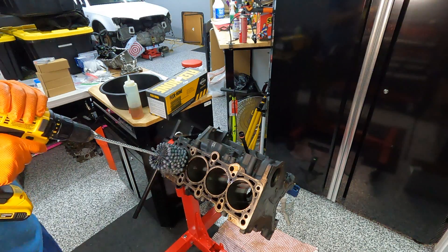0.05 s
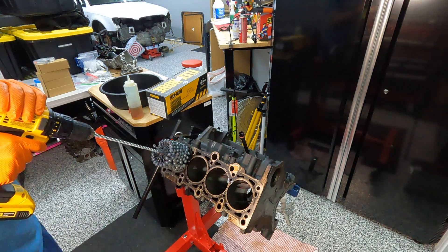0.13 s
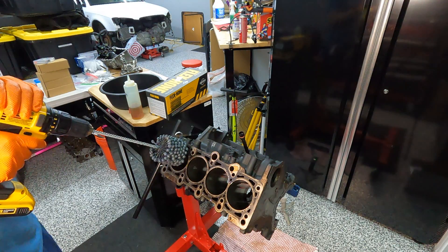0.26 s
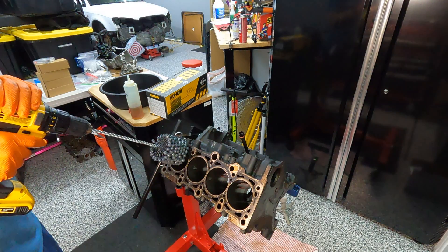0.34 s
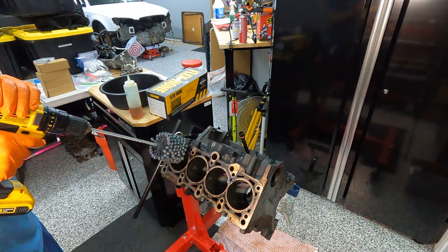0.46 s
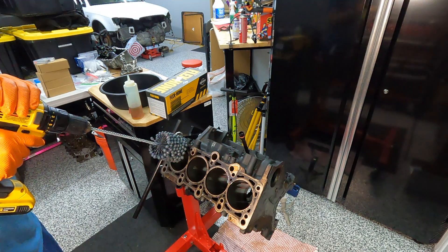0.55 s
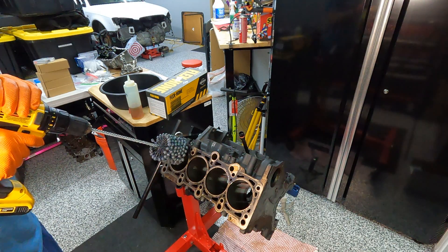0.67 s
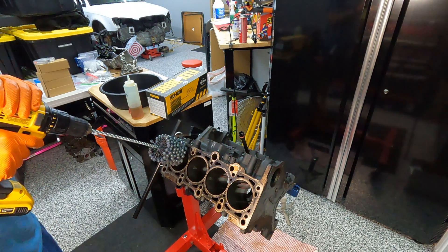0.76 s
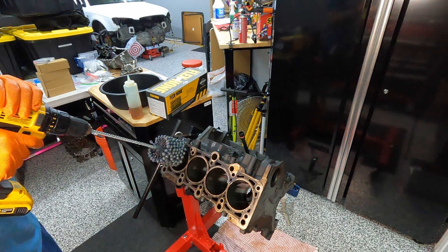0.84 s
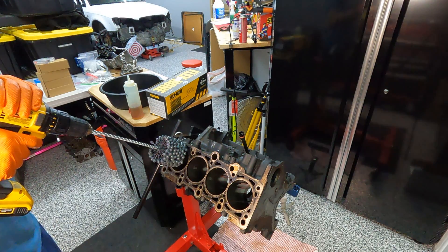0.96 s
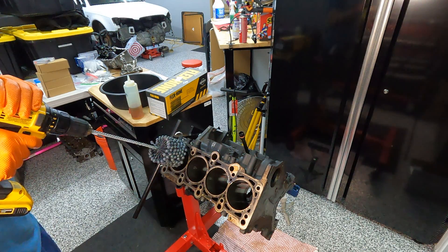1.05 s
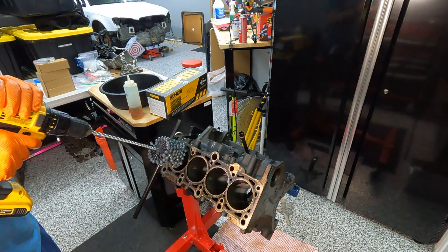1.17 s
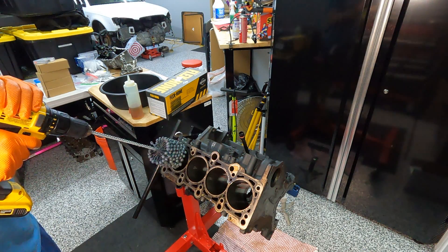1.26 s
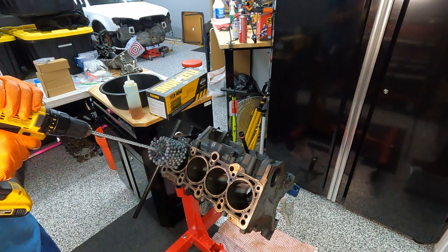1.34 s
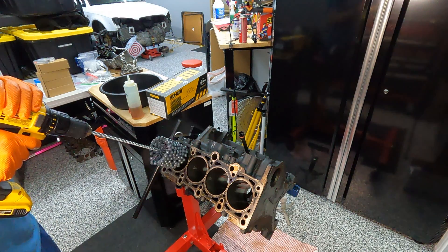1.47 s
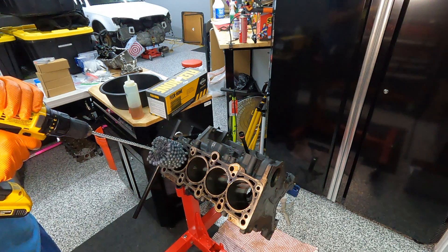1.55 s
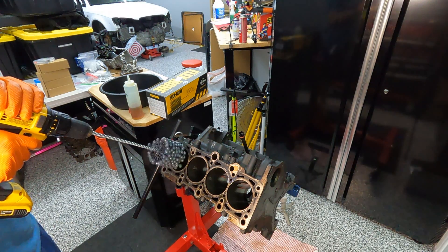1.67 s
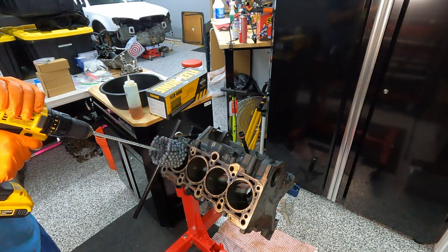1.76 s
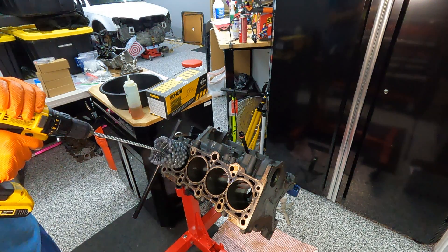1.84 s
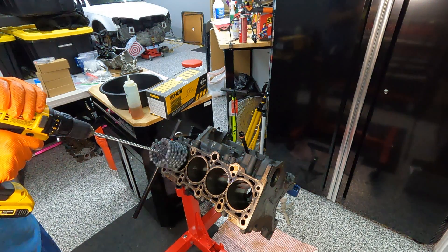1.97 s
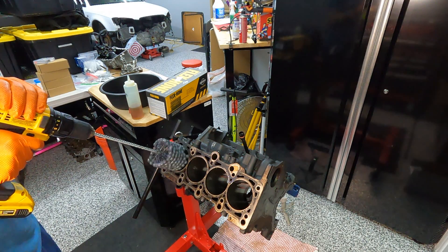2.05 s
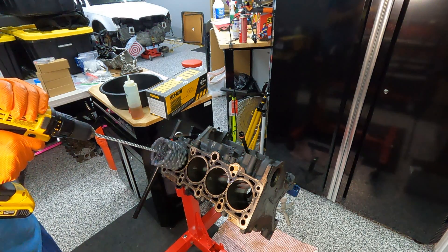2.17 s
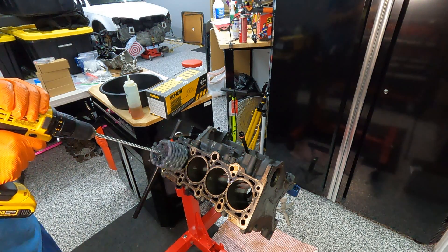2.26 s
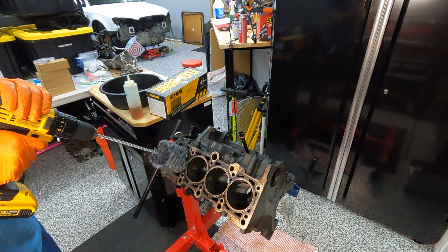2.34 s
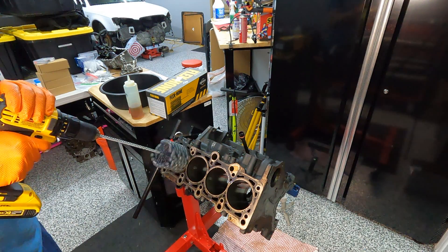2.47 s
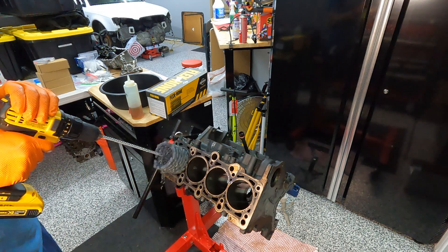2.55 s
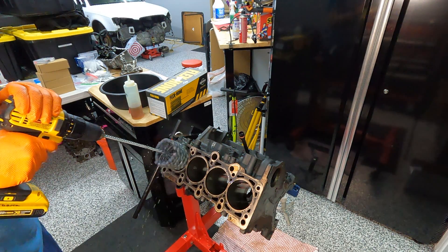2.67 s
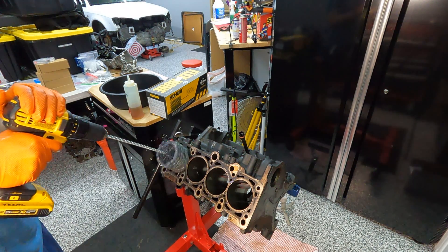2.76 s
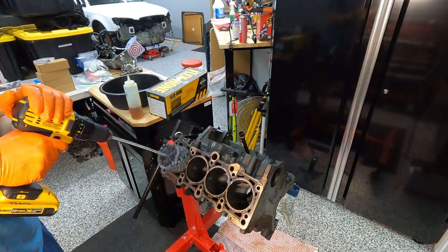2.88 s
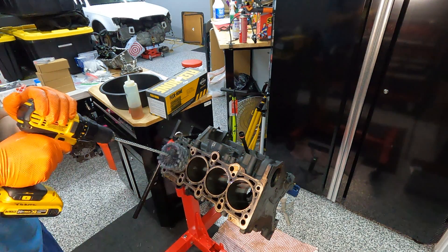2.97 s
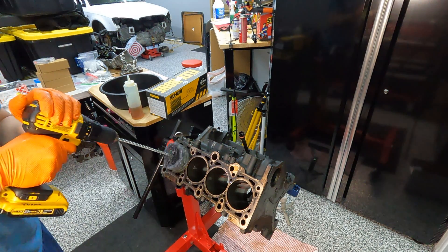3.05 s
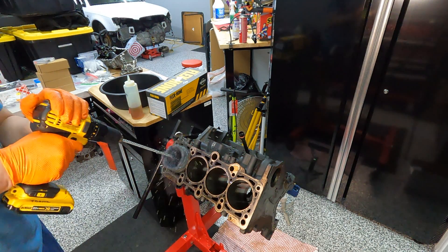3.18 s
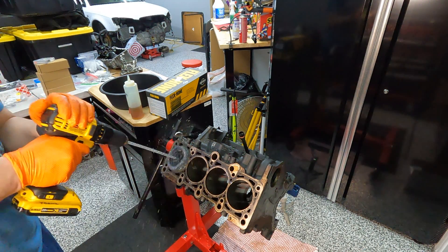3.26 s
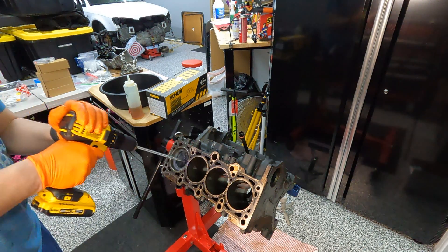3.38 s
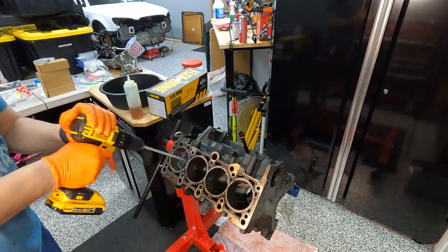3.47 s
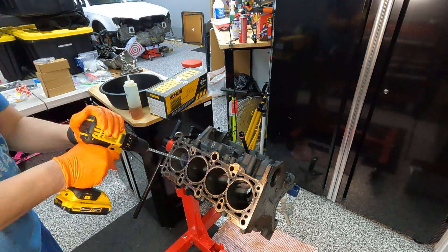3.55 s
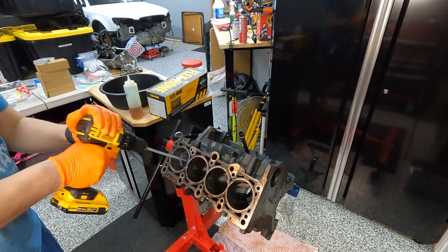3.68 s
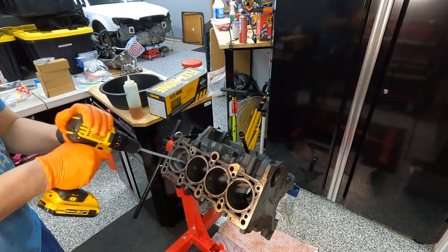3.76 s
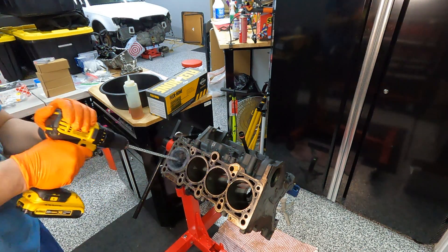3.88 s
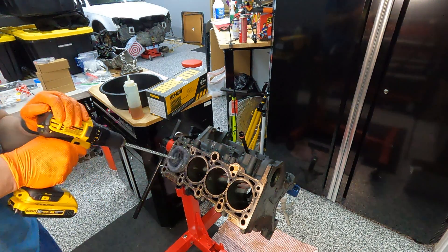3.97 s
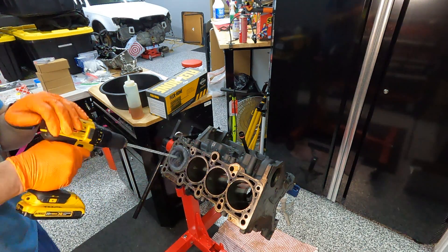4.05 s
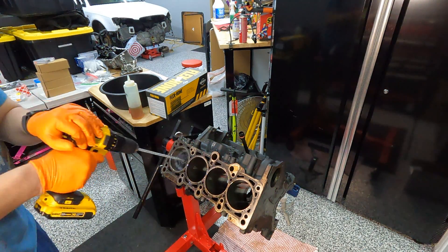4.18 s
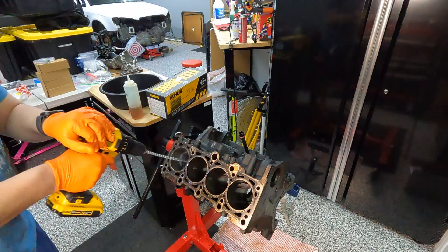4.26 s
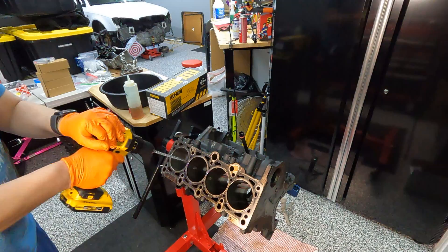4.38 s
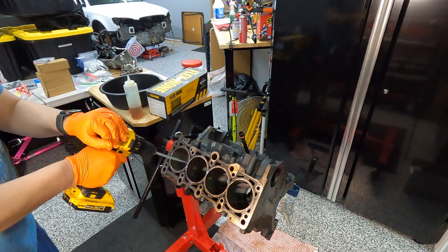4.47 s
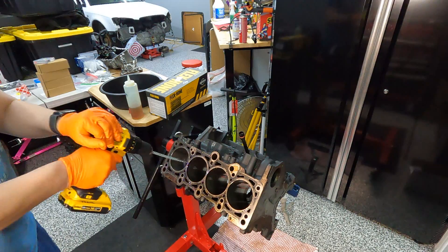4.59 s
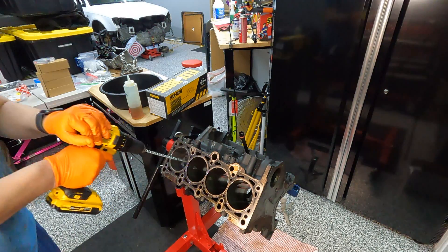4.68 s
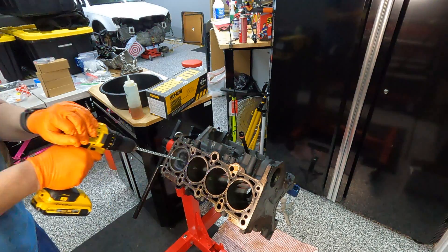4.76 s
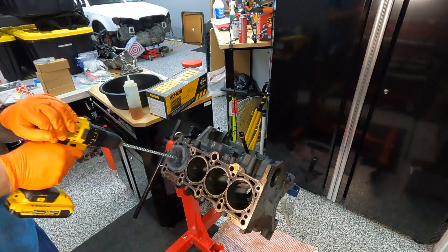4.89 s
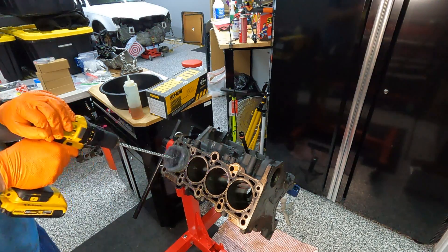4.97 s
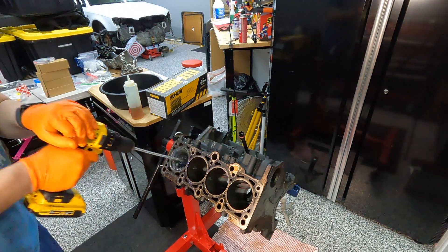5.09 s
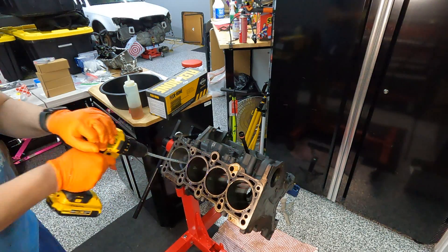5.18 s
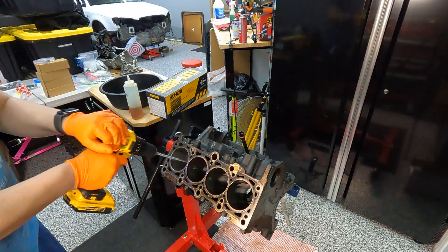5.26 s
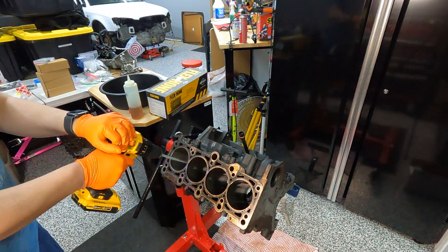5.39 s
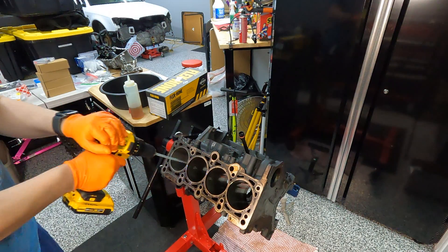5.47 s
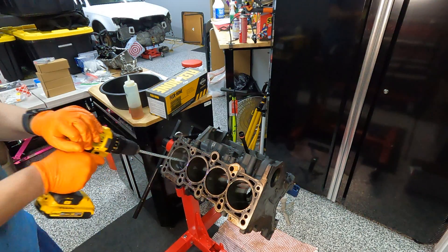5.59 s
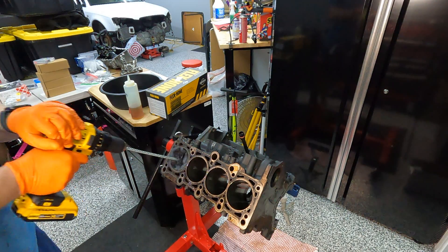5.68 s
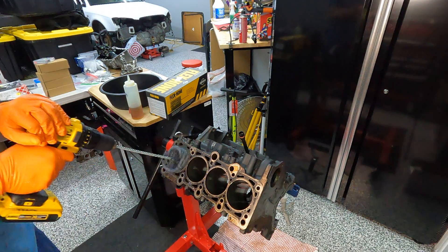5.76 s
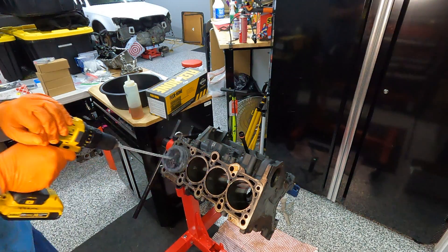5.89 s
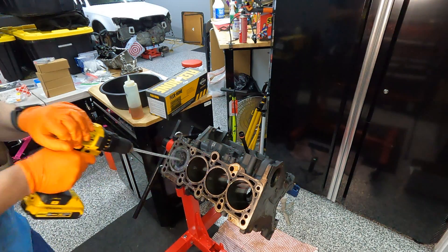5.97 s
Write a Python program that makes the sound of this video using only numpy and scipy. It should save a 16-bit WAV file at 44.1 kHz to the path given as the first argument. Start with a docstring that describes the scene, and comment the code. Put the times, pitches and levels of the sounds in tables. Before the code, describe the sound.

Close in a small garage, over a low rumble, gloves rub softly and a few beads tick. At just over a second a drill creeps on with a thin electronic squeal and slow gear chatter, climbing to a medium whine. Around three seconds a sharp click and surge bring full speed; rattling and whirring, it drives a hone whose repeated pushes scrape, hiss and faintly ring the metal block.

```python
"""In a garage, a cordless drill spins a ball hone in an oiled engine cylinder.
After quiet handling the trigger is eased in: the speed controller sings, the gears creep, then whine.
The whine is a harmonic series on the motor speed; rattle, whirr, scraping and hiss are coloured noise.
Pushes of the hone into the bore scrape harder and excite the modes of the engine block;
dips in the driving speed stand for its drag on the motor. Short reflections and a low rumble surround it."""
import sys
import numpy as np
from scipy import signal
from scipy.fft import irfft, next_fast_len
from scipy.io import wavfile

SR = 44100
rng = np.random.default_rng(int(sys.argv[2]) if len(sys.argv) > 2 else 0)


def file_out(sig):
    """Save sig as 16-bit WAV at sys.argv[1]."""
    # one column per channel
    cols = np.atleast_2d(sig).T
    # limit, then scale
    lim = np.clip(cols, -1, 1)
    pcm = np.round(lim * 32767).astype(np.int16)
    wavfile.write(sys.argv[1], SR, pcm)


N = 265923
T = np.arange(N) / SR
HZ = np.fft.rfftfreq(2 * next_fast_len(N // 2 + 1), 1 / SR)

# Speed the motor heads for, set by the trigger and dragged down by the hone.
# Each row: time in seconds, motor shaft speed in turns per second.
DRIVE = [(1.277, 1.0), (1.357, 43.1), (1.52, 36.1), (1.636, 66.6), (1.819, 78.1), (2.108, 109.9),
         (2.168, 146.1), (2.408, 177.7), (2.7, 183.1), (2.956, 166.5), (3.065, 146.8), (3.137, 222.7),
         (3.2, 213.4), (3.268, 366.1), (3.542, 373.0), (3.827, 368.1), (4.043, 371.5), (4.408, 367.7),
         (4.766, 354.7), (4.798, 361.8), (5.084, 373.4), (5.567, 353.8), (5.781, 366.5), (6.027, 377.4)]
# Main gear tone. Each row: time in seconds, level in dB.
MAIN_TONE = [(1.6, -67), (2.15, -59), (2.5, -33), (2.85, -34.5), (3.07, -44.5), (3.14, -37.5), (3.5, -33),
             (3.8, -39), (4.05, -30), (4.35, -39.5), (4.5, -31), (4.8, -38.5), (5.15, -27), (5.55, -36),
             (5.85, -32)]
# Other gear and slot tones, before the shell shapes them. Each entry: multiple of the shaft rate, then
# level at half speed in dB, growth in dB per doubling of speed, change under the hand in dB.
GEAR_TONES = {1: (-45, 2.9, 1.3), 2: (-55, 14.5, -7.5), 4: (-60.5, 15, -1), 16: (-45.5, 5.3, -2.9),
              18: (-60.5, 23, -14), 19: (-57.5, 24.2, -1.4), 20: (-46.5, 10.7, -14), 29: (-46.5, 7.4, -8),
              30: (-44.5, 14.2, -8), 31: (-52, 7, -10), 32: (-48.5, 12, -11), 35: (-56, 16, -10),
              40: (-42.5, 12, -10), 41: (-53, 12, 0), 47: (-47, 15, 0), 50: (-44.5, 13, 0),
              60: (-48.5, 8.8, 0), 70: (-49.5, 8.7, 0), 80: (-54.5, 5, 0), 90: (-61, 5.2, 0)}
# Modes of the drill's shell. Each row: frequency in Hz, nominal width in Hz, relative level in dB.
SHELL_MODES = [(696, 590, -17), (1760, 530, -2), (2760, 900, 2.5), (4310, 790, 3), (5776, 680, 5.5),
               (7530, 450, 4.5), (11900, 730, -3)]
# Controller tones, split by the turning rotor.
# Each row: multiple of the switching rate, shaft orders added, relative level in dB.
SIDEBANDS = [(1, -10, -4.5), (1, -2, -6), (1, 0, 0.5), (1, 2, -7), (1, 10, -1), (2, -1, 2), (2, 0, -3.5),
             (2, 2, -9), (3, 0, -12.5)]
# Noise spectra of the gear rattle and of the fan and shaft whirr.
# Each row: frequency in Hz, relative density in dB per Hz.
RATTLE_COLOUR = [(500, -14), (1200, 0), (1700, -4), (2300, -3), (2900, 0.5), (3500, 0), (4300, 3.5),
                 (5800, 2), (7400, -1), (8600, -5.5), (10500, -13), (12100, -11.5), (13200, -26),
                 (15500, -48)]
WHIRR_COLOUR = [(120, -55), (250, -13), (450, -6.5), (600, 0), (850, -0.5), (1100, 5), (1450, 2), (2000, 5),
                (3500, -30)]
# Pushes of the hone into the bore. Each row: deepest moment in seconds, half length in seconds,
# scraping in dB, oily hiss in dB before HISS_LIFT_DB.
STROKES = [(2.976, 0.31, -36.5, -46.5), (3.294, .04, -38, -58), (3.775, 0.15, -36.5, -40),
           (4.224, 0.069, -35.5, -44), (4.625, 0.23, -32, -37.5), (5.506, 0.2, -31.5, -37)]
# Noise spectra of the scraping and of the oily hiss.
# Each row: frequency in Hz, relative density in dB per Hz.
SCRAPE_COLOUR = [(700, -44.5), (1500, -49), (2000, 1.5), (2600, 9), (3200, 7), (4200, 12), (6500, -8),
                 (10000, -23)]
HISS_COLOUR = [(3000, -54), (5000, 2.5), (7500, 4.5), (8700, -0.5), (10300, -4), (12000, -5), (13300, -10),
               (15000, -41), (15600, -35)]
# Modes of the engine block. Each row: frequency in Hz, nominal width in Hz, relative level in dB.
BLOCK_MODES = [(295, 20, -21), (543, 20, -20), (740, 25, -18), (1190, 60, -12), (1570, 35, -8),
               (1812, 25, -2.5), (2133, 30, -3), (2435, 25, -1), (2545, 25, 2), (2820, 30, -2),
               (2943, 35, 4), (3199, 35, -4), (5005, 35, -4)]
# Gloves rubbing on the grip, then brushes of sleeve and glove.
# Each row: centre in seconds, half length in seconds, level in dB.
RUBS = [(.53, 0.05, -64.5), (.78, 0.088, -65.5), (.8, 0.37, -65.5)]
BRUSHES = [(0.025, 0.087, -64), (.415, 0.05, -67.5), (.597, 0.053, -71.5), (.796, 0.34, -78)]
# Noise spectra of the rubbing and of the brushing swish.
# Each row: frequency in Hz, relative density in dB per Hz.
RUB_COLOUR = [(90, -34), (160, -2), (230, -17), (280, 4), (340, -9), (490, -9), (670, -29), (1300, -22),
              (3000, -49)]
SWISH_COLOUR = [(530, -37), (900, 5), (955, -13), (1040, 0), (1270, -1), (5580, 2.5), (12300, -16.5),
                (15000, -36)]
# Ticks of the hone's beads and the trigger. Each row: start in seconds, nominal peak in dB, top in Hz.
TICKS = [(.865, -53, 8000), (1.032, -61, 12000), (1.037, -50.5, 2300), (1.117, -62, 12000),
         (1.291, -48, 9650), (3.044, -16.5, 10700)]
# Left-right balance. Each row: time in seconds, left minus right in dB.
BALANCE = [(1.15, -4), (1.3, 3.5), (4, 2), (5.2, 1.3), (6, 2)]
# Correlation of diffuse noise between the channels. Each row: frequency in Hz, correlation.
LIKENESS = [(50, .98), (150, 0.78), (1000, 0.93), (3000, 0.66), (6000, 0.94), (9000, 0.7), (12500, 0.55)]
# Background rumble: its spectrum. Each row: frequency in Hz, relative density in dB per Hz.
FLOOR_COLOUR = [(20, 4), (40, 2.5), (70, 1), (115, -5), (170, 7), (240, -2), (400, -16.5), (1200, -19.5),
                (3000, -31.5), (7000, -30.5), (10000, -47), (12000, -41), (15000, -51)]
# Background rumble: its slowly changing level. Each row: time in seconds, level in dB.
FLOOR_LEVEL = [(.9, -64.5), (1.6, -70), (3.4, -67.5), (4.3, -68.5), (6, -68)]

# motor: lag in s, reference speeds in turns per s, and the shortfall of speed at which it strains
INERTIA_S = 0.065
HALF_SPEED, FULL_SPEED = 180, 370
HARD_ACCELERATION = 65  # turns per s
TRIGGER_S, FULL_TRIGGER_S = 1.289, 3.17

# whine
MAIN_ORDER = 10  # gear teeth per motor turn
MAIN_FLUTTER_DB = 3.5  # reached at twice HALF_SPEED
MESH_S, MESH_TAKES_S = 1.5, 0.18  # the teeth begin to sing
GRIP_S, GRIP_TAKES_S = 4.16, 0.46  # the free hand closes over the housing
SLACK_TURNS = 0.0014  # play of the teeth, which smears the higher tones
CREEP_DB, CREEP_BELOW = 5, 135  # the teeth sing out more below this speed in turns per s
TONES_TORQUE_DB, LOAD_DAMPS_DB = 4, -4  # under hard acceleration; at the hone's hardest bite
TONES_TOP_HZ = 9300  # the housing radiates little of the tones above this

# controller: level at half speed, growth per doubling of speed
SWITCH_HZ = 3925
SWITCH_DB, SWITCH_RISE_DB = -48.5, 2

# rattle: level far above the knee, knee in turns per s, growth per doubling below it, extra under strain
RATTLE_DB, RATTLE_KNEE, RATTLE_RISE_DB, RATTLE_TORQUE_DB = -32, 134, 9.5, 3.5
# whirr: level at full speed, growth per doubling of speed, extra once the hone is in the bore
WHIRR_DB, WHIRR_RISE_DB, IN_BORE_DB = -45.5, 3.5, 4.5
ENTER_S, ENTER_TAKES_S = 1.77, 1

# hone
STROKE_SQUARENESS = 3.5  # 2 = a bell; more = a flatter top
RESTING_SCRAPE_DB, RESTING_HISS_DB = -45, -46  # beads spinning between pushes; hiss before its lift
HISS_LIFT_DB = 6
RING_DB = 1  # the block's ring against the scraping at the hardest push
GEAR_RATIO = 22  # motor turns per chuck turn

RADIATES_FROM_HZ = 170  # drill and block are too small to radiate deep bass
EDGE_HZ = 15500


def shaft():
    """Rotational inertia: speed follows the drive as a first-order lag; gear play makes it flutter."""
    drive, = curves(DRIVE)
    keep = np.exp(-1 / (INERTIA_S * SR))
    lagging = signal.lfilter([1 - keep], [1, -keep], drive)
    speed = np.maximum(lagging + 0.45 * wander(70), 1)
    turns = np.cumsum(speed) / SR
    return speed, turns


def whine(speed, turns, drift_db=2.0):
    """Harmonic excitation: teeth and slots sound at multiples of the shaft rate and flare at shell modes."""
    doublings = np.log2(speed / HALF_SPEED)
    grip = fade(GRIP_S, GRIP_TAKES_S)
    bite = sum(amp(db) * swell(s, half_length) for s, half_length, db, _ in STROKES)
    creeping = np.clip(3 * (1 - speed / CREEP_BELOW), 0, 1)
    effort_db = CREEP_DB * creeping + TONES_TORQUE_DB * torque(speed) + LOAD_DAMPS_DB * bite / bite.max()

    # the main tone has its own level curve and flutters once the motor runs fast
    main_db, = curves(MAIN_TONE)
    flutter = evened(amp(MAIN_FLUTTER_DB * np.clip(doublings, 0, 1) * wander(12)))
    tones = amp(main_db) * flutter * tone(MAIN_ORDER * turns, waver=0.2, spread=0.24)

    for multiple, (db, rise_db, grip_db) in GEAR_TONES.items():
        hz = multiple * speed
        shell = resonances(SHELL_MODES, hz) ** 1.19 + 0.12
        body = shell / np.sqrt(1 + (hz / TONES_TOP_HZ) ** 10)
        # each tone swells and sinks as the drill moves among its own reflections
        drift = drift_db * wander(7)
        gain = amp(db + rise_db * doublings + grip_db * grip + effort_db + drift)
        smeared_turns = turns + SLACK_TURNS * wander(90)
        tones = tones + gain * body * tone(multiple * smeared_turns, waver=0.23, spread=0.29)
    return tones * fade(MESH_S, MESH_TAKES_S)


def controller(speed, turns):
    """Pulse-width modulation: chopped current sings in the windings; the octave vanishes at half duty."""
    sounding = fade(TRIGGER_S, 0.0044) * (1 - fade(FULL_TRIGGER_S, 0.067))
    level = amp(SWITCH_DB + SWITCH_RISE_DB * np.log2(speed / HALF_SPEED)) * sounding
    duty = np.clip(0.17 + speed / 420, 0, 1)  # pulses widen with speed
    lines = 0
    for k, order, db in SIDEBANDS:
        k, order = round(k), round(order)
        pulse_harmonic = np.sin(k * np.pi * duty)
        cycles = k * SWITCH_HZ * T + order * turns
        lines = lines + amp(db) * pulse_harmonic * tone(cycles, waver=0.35, spread=0.35)
    sizzle = noise(1 / (1 + ((HZ - 12100) / 280) ** 2))
    return level * (lines + amp(-12) * sizzle)


def gearbox(speed, turns):
    """Impact excitation: teeth rattle the shell in bursts at 1 and 10 per motor turn, over the whirr."""
    below_knee = np.log2(speed / np.hypot(speed, RATTLE_KNEE))
    strain_db = RATTLE_TORQUE_DB * torque(speed)
    rattle_db = RATTLE_DB + RATTLE_RISE_DB * below_knee + strain_db + 0.5 * wander(8)
    once, ten_times = np.cos(2 * np.pi * turns), np.cos(2 * np.pi * 10 * turns)
    bursts = evened(amp(0.97 * once + ten_times + wander(210)))
    rattle = amp(rattle_db) * bursts * noise(colour(RATTLE_COLOUR) * (resonances(SHELL_MODES, HZ) + 1))

    in_bore_db = IN_BORE_DB * fade(ENTER_S, ENTER_TAKES_S)
    whirr_db = WHIRR_DB + WHIRR_RISE_DB * np.log2(speed / FULL_SPEED) + in_bore_db + 0.53 * wander(10)
    whirr = amp(whirr_db) * noise(colour(WHIRR_COLOUR))
    return (rattle + whirr) * fade(TRIGGER_S, 0.025)


def hone(turns):
    """Friction-driven resonance: beads scrape in fine grains, pulse with the chuck and ring the block."""
    scrape_db, hiss_db = pressure()
    pulse = amp(0.19 * np.cos(2 * np.pi * turns / GEAR_RATIO))
    grains = evened(amp(2 * wander(970) + np.cos(2 * np.pi * turns)))
    scrape = amp(scrape_db) * grains * noise(colour(SCRAPE_COLOUR))
    hiss = amp(hiss_db + HISS_LIFT_DB + wander(40)) * grains * noise(colour(HISS_COLOUR))

    # each mode swells and sinks at random
    modes = 0
    for mode in BLOCK_MODES:
        mode_gain = amp(mode[2] + 2.5 * wander(5))
        modes = modes + mode_gain * noise(resonances([mode], HZ) ** 1.3)
    # the block rings mostly when the beads press hard
    ring_db = scrape_db + RING_DB + 0.5 * (scrape_db - scrape_db.max())
    ring = amp(ring_db) * evened(modes)
    return (scrape + hiss + ring) * pulse * fade(1.99, 1.0)


def pressure():
    """Addition of powers: each push adds to the steady scraping and hiss; returns both in dB."""
    scrape, hiss = amp(2 * RESTING_SCRAPE_DB), amp(2 * RESTING_HISS_DB)
    for s, half_length, scrape_db, hiss_db in STROKES:
        push = swell(s, half_length, STROKE_SQUARENESS)
        scrape = scrape + amp(2 * scrape_db) * push
        hiss = hiss + amp(2 * hiss_db) * push
    return 10 * np.log10(scrape), 10 * np.log10(hiss)


def torque(speed):
    """Saturating torque: how hard the motor accelerates, 0 to 1, from its shortfall of speed."""
    drive, = curves(DRIVE)
    return np.tanh(np.maximum(drive - speed, 0) / HARD_ACCELERATION)


def handling():
    """Sliding friction: gloves and sleeves make coloured noise in humps before the trigger is pulled."""
    rubbing = sum(amp(db) * swell(s, half_length) for s, half_length, db in RUBS)
    brushing = sum(amp(db) * swell(s, half_length) for s, half_length, db in BRUSHES)
    return rubbing * noise(colour(RUB_COLOUR)) + brushing * noise(colour(SWISH_COLOUR))


def ticks():
    """Impulsive contact: noise decays at once, then more slowly in a faint tail from the room."""
    out = 0
    for s, db, top_hz in TICKS:
        age = np.maximum(T - s, 0)
        decay = np.exp(-age / 0.0017) + 0.19 * np.exp(-age / 0.043)
        level = amp(db - 9.5) * (T >= s) * decay  # 9.5 dB from peak to rms
        spectrum = np.minimum(HZ / top_hz, 1) ** 0.5 / (1 + (HZ / top_hz) ** 8)
        out = out + level * noise(spectrum)
    return out


def garage(x, wet_db=-11, t60=0.16):
    """Reverberation: sparse decaying echoes, as from benches and cabinet doors, colour the sound."""
    t = np.arange(SR // 3) / SR
    echoes = rng.random((3, len(t))) < 2000 / SR  # 2000 per second
    taps = rng.standard_normal((3, len(t))) * echoes
    # the third set is shared by both channels
    tail = (taps[:2] + 0.65 * taps[2]) * amp(-60 * t / t60) * (t > 0.003)
    tail /= np.linalg.norm(tail, axis=1, keepdims=True)
    return x + amp(wet_db) * signal.fftconvolve(x, tail, axes=1)[:, :N]


def background():
    """Stationary noise under a slow envelope: a steady low rumble whose level changes slowly."""
    floor_db, = curves(FLOOR_LEVEL)
    return amp(floor_db) * noise(colour(FLOOR_COLOUR))


def tone(turns, waver, spread):
    """Modulated sinusoid: level wavers, and phase between the channels, as the drill moves."""
    phase = 2 * np.pi * (turns + rng.random())
    apart = spread * wander(14) * np.array([[1], [-1]])
    return np.sqrt(2) * np.cos(phase + apart) * evened(1 + waver * wander(30.4))


def noise(gain):
    """Partial coherence: noise of the given spectrum, partly alike in two channels, rms 1."""
    a, b = rng.standard_normal((2, len(HZ))) + 1j * rng.standard_normal((2, len(HZ)))
    same = np.clip(read(LIKENESS, HZ), 0, 1)
    mid, side = a * np.sqrt(1 + same), b * np.sqrt(1 - same)
    return evened(irfft(np.array([mid + side, mid - side]) * gain)[:, :N])


def resonances(modes, hz):
    """Modal response: gain of a body whose modes add in power; it radiates little below them."""
    power = 0
    for f, width, db in modes:
        below = np.minimum(hz / f, 1) ** 2
        power = power + amp(2 * db) * below / (1 + (2 * (hz - f) / width) ** 2)
    return np.sqrt(power)


def colour(points):
    """Spectral shaping: a spectrum as gains, falling away steeply below its lowest point."""
    return amp(read(points, HZ)) * np.minimum(HZ / points[0][0], 1) ** 2


def read(points, hz):
    """Logarithmic pitch scale: reads a spectrum on a log-frequency axis."""
    f, value = np.transpose(points)
    return np.interp(np.log(hz + 1), np.log(f + 1), value)


def wander(rate_hz):
    """Random modulation: chance values joined by straight lines, rms 1."""
    times = np.arange(0, T[-1] + 1, 0.5 / rate_hz)
    return evened(np.interp(T + rng.random(), times, rng.standard_normal(len(times))))


def swell(s, half_length, squareness=2):
    """Generalised Gaussian envelope: a smooth hump of height 1."""
    return np.exp(-np.abs((T - s) / half_length) ** squareness)


def fade(start, length):
    """Linear envelope: rises from 0 to 1, times in seconds."""
    return np.clip((T - start) / length, 0, 1)


def curves(rows):
    """Linear interpolation: the columns of a time table at every sample."""
    s, *columns = np.transpose(rows)
    return [np.interp(T, s, c) for c in columns]


def evened(x):
    """Power normalisation: scales to an rms of 1."""
    return x / np.sqrt(np.mean(x ** 2) + 1e-20)


def amp(db):
    """Logarithmic level: decibels to gain."""
    return 10 ** (np.asarray(db) / 20)


def scene():
    """Superposition: handling, drill and hone, balanced left to right, over the quiet of the garage."""
    speed, turns = shaft()
    machine = whine(speed, turns) + controller(speed, turns) + gearbox(speed, turns) + hone(turns)
    radiation = signal.butter(4, RADIATES_FROM_HZ, "high", fs=SR, output="sos")
    machine = signal.sosfilt(radiation, machine)
    left_db, = curves(BALANCE)
    balance = amp(np.array([left_db, -left_db]) / 2)
    return garage(machine + handling() + ticks()) * balance + background()


def record(dry):
    """Band limitation: a linear-phase low-pass removes the highest treble."""
    lowpass = signal.firwin(511, EDGE_HZ, window=("kaiser", 9), fs=SR)
    return signal.oaconvolve(dry, lowpass[None], "same")


dry = scene()
out = record(dry)
file_out(out)
```